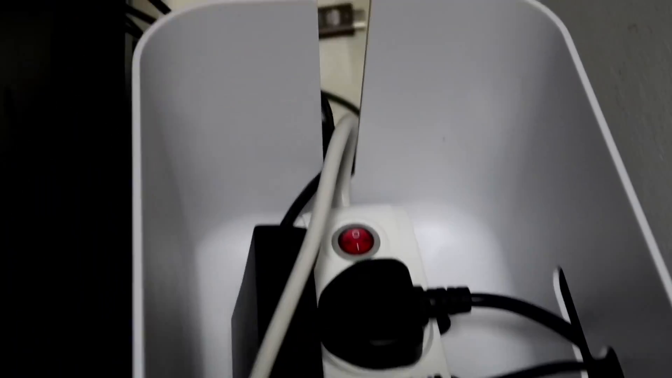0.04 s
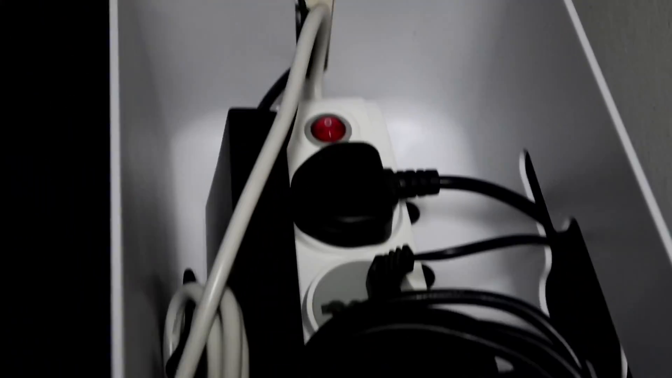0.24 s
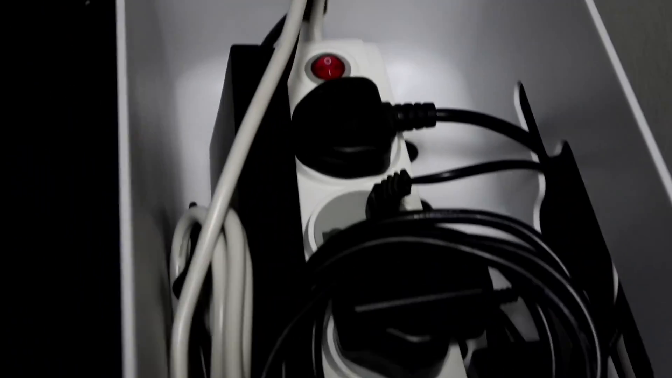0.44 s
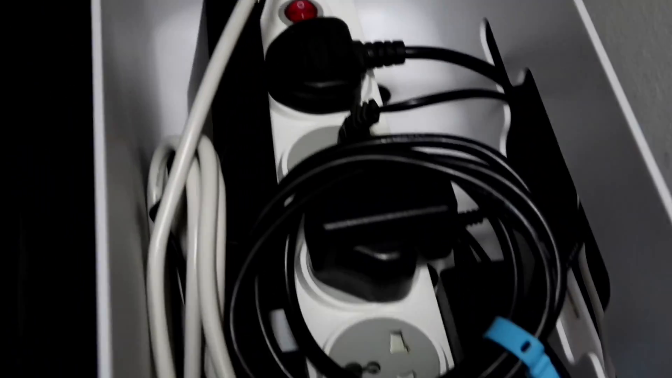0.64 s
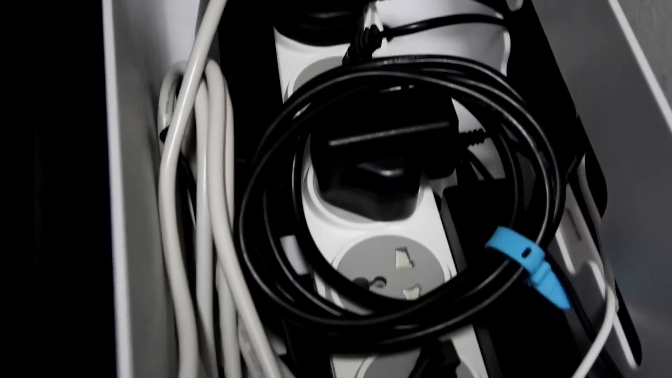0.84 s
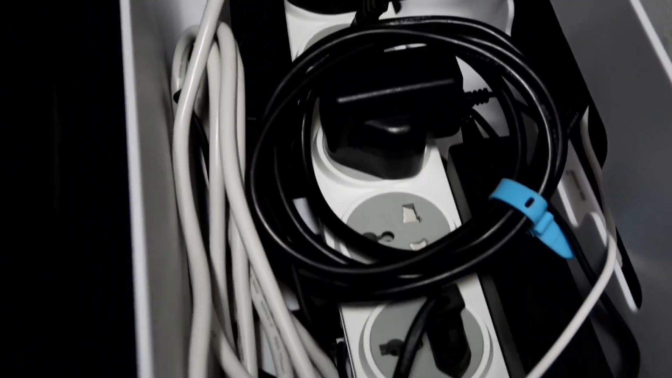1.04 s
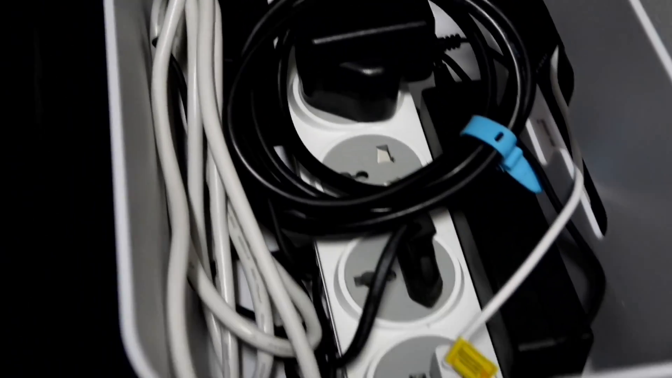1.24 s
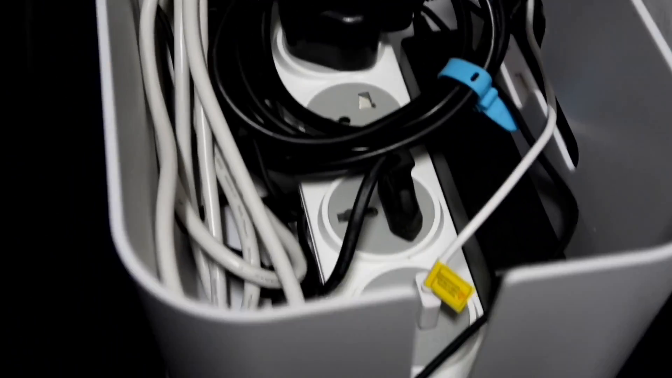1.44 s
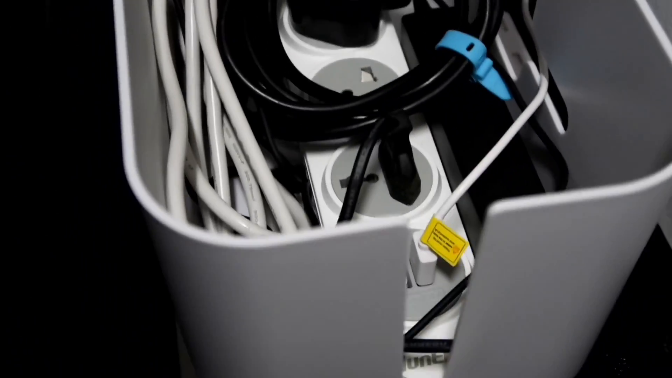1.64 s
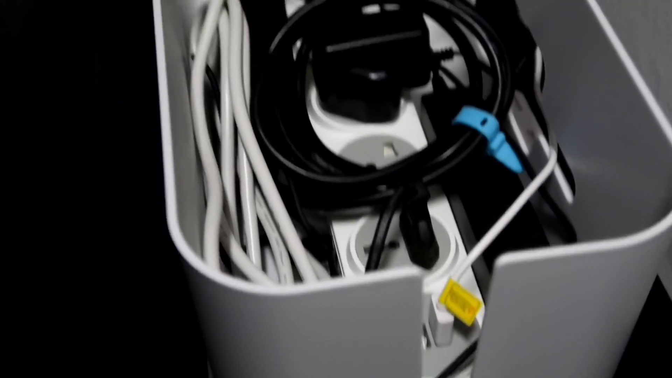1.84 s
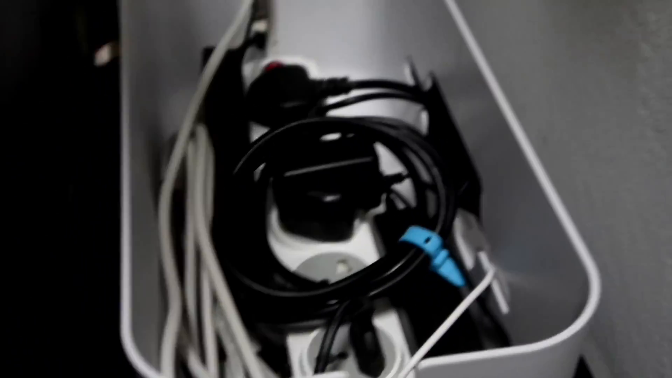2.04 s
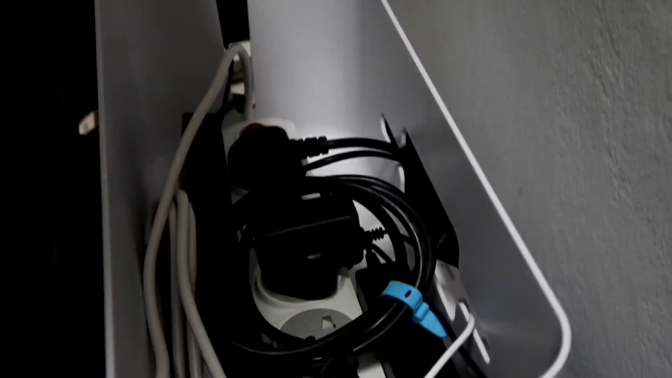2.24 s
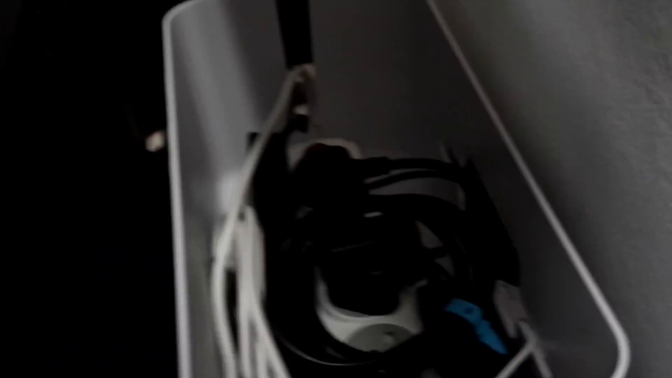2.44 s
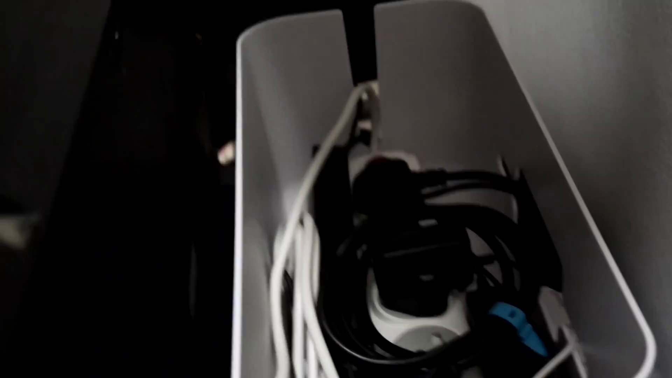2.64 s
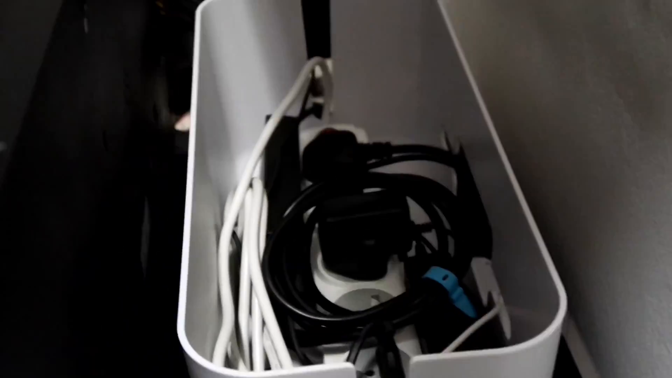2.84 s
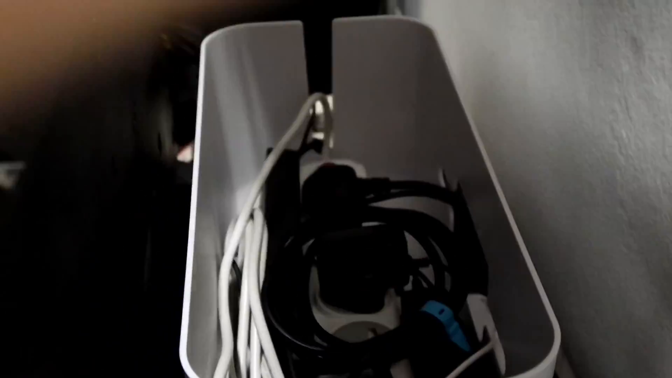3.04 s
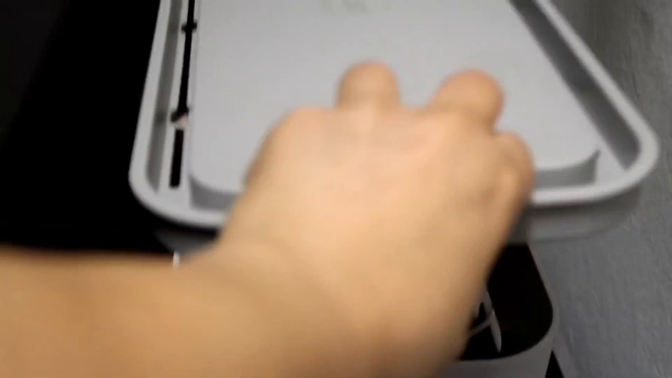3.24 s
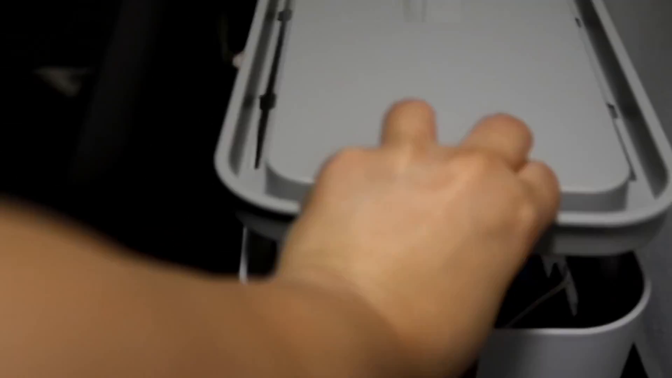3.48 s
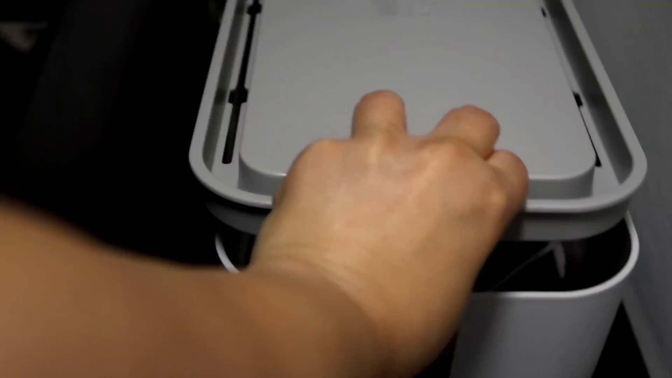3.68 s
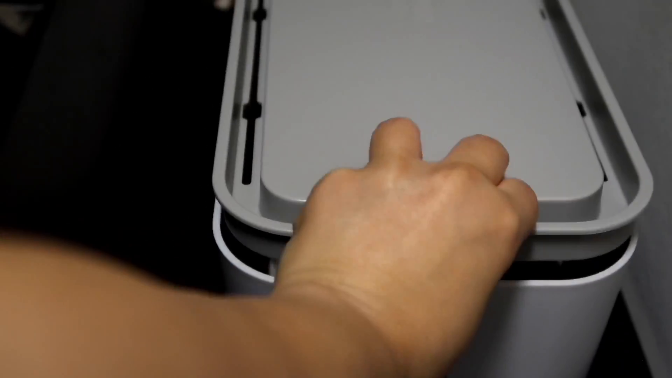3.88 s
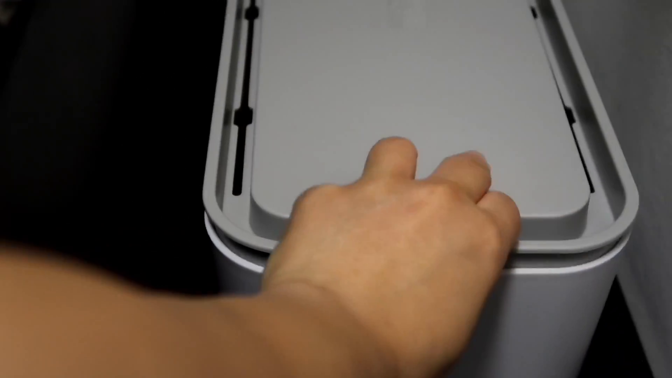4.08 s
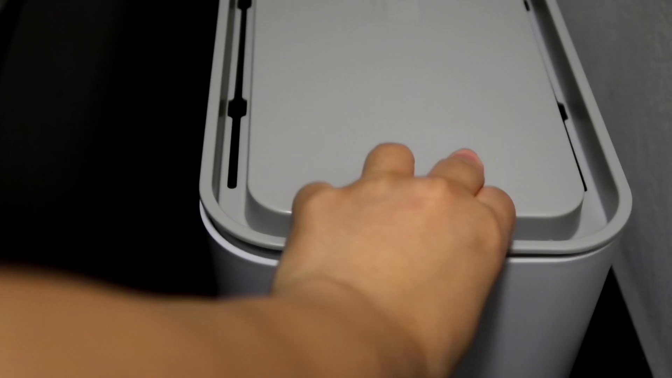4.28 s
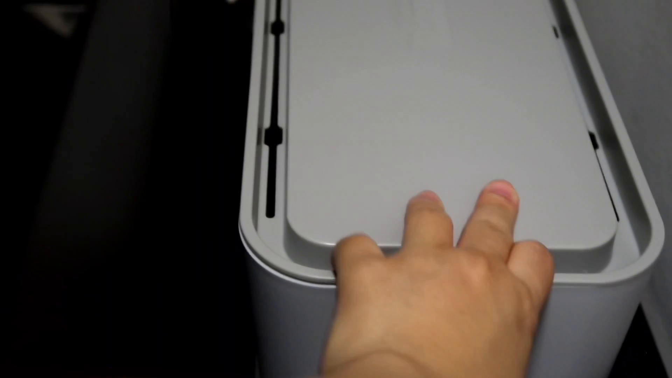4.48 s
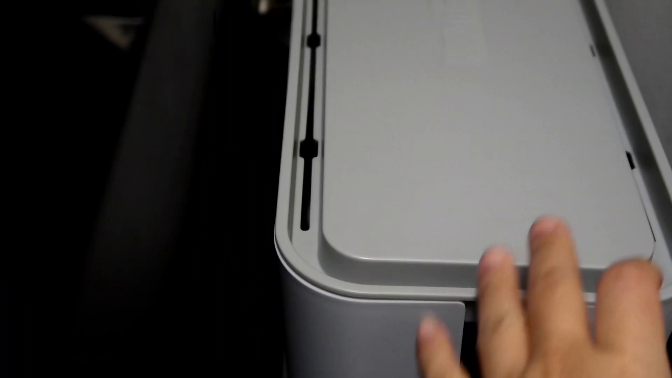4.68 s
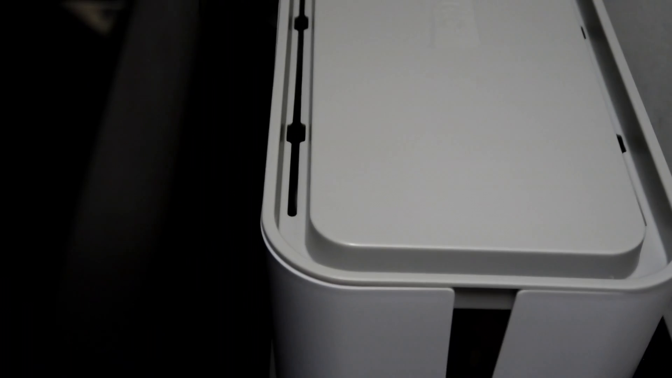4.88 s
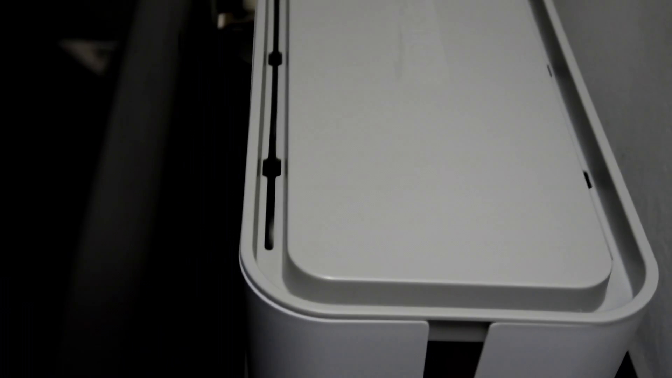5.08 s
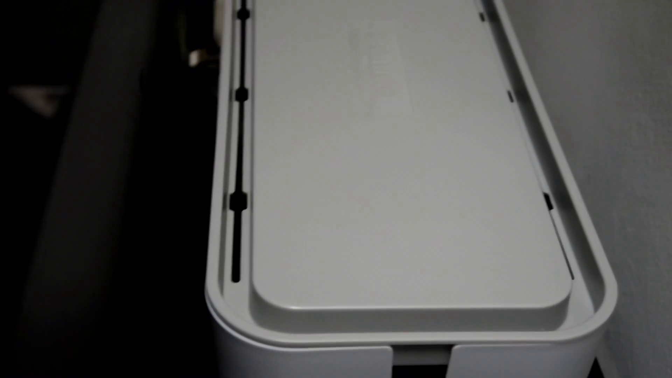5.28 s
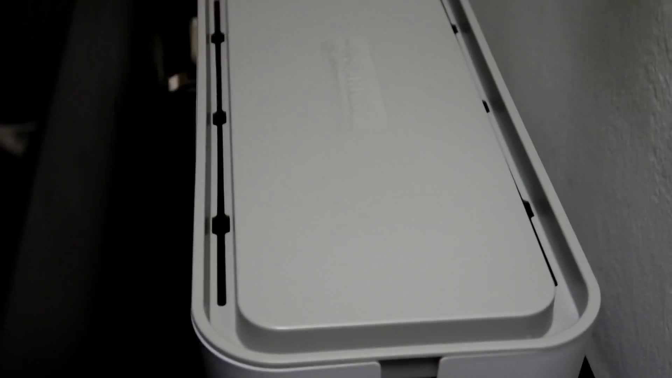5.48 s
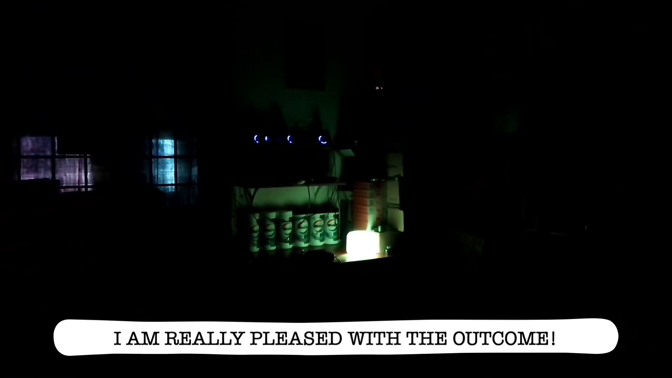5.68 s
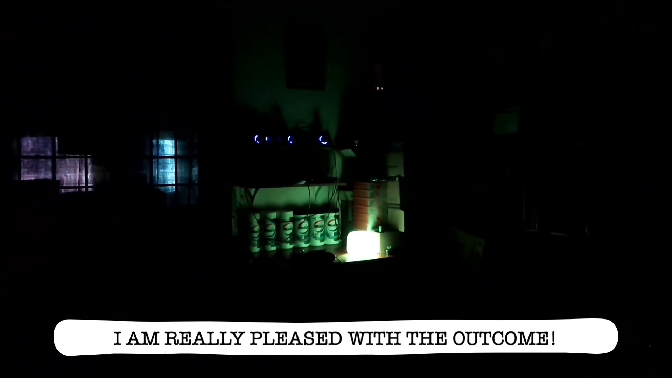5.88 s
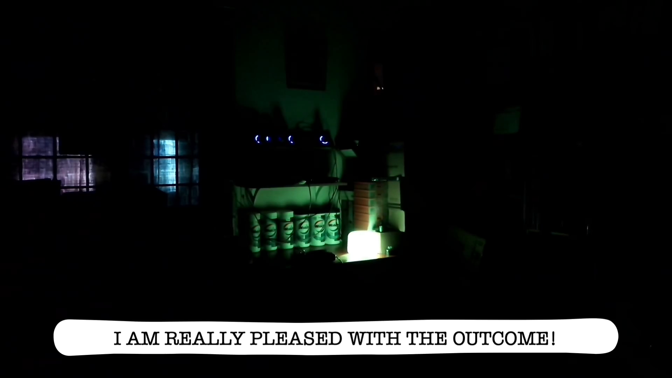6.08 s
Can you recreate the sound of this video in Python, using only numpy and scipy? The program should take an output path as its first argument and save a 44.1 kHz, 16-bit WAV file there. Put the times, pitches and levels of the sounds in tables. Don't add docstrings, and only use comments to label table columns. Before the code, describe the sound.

Close stereo sound indoors: far ticking and soft fan hum, a faint chair creak, then a hard double plastic-on-wood knock, bright snap and loose chatter. Fingers shift softly on the lid. It lands hard on a hollow box, bounces in quick weakening taps, squeaks into place and clicks shut. Muffled creeping squeaks and bumps fade to quiet, before a different room's air with dull distant bumps.

```python
import sys
import numpy as np
from scipy import signal
from scipy.fft import rfft, irfft
from scipy.io import wavfile
from scipy.ndimage import uniform_filter1d

SR = 44100
rng = np.random.default_rng(int(sys.argv[2]) if len(sys.argv) > 2 else 0)


def put_to_file(sound):
    columns = np.atleast_2d(sound).T
    safe = np.clip(columns, -1, 1)
    whole_steps = np.round(safe * 32767)
    wavfile.write(sys.argv[1], SR, whole_steps.astype(np.int16))


def volts_from_decibels(level):
    exponent = np.asarray(level, float) / 20
    return 10 ** exponent


N = 269847

# (pitch [Hz], level [dB], t60 [s])
BOX = [(223, -9, 0.024), (291.4, -5.5, 0.11), (345, 1.5, 0.046)]
# (pitch [Hz], level [dB], t60 [s])
BOARD = [(240.5, 6.5, 0.16), (333.6, 5.5, 0.067), (523, -18, 0.14)]
# (fade-out start [s], fade-out end [s], fade-in start [s], fade-in end [s])
ROOM_CHANGE = (5.651, 5.657, 5.682, 5.7)


def evened(x):
    return x / np.sqrt(np.mean(x ** 2) + 1e-20)


def read(points, hz):
    f, value = np.transpose(points)
    return np.interp(np.log(hz + 1), np.log(f + 1), value)


def add(mix, s, sound):
    part = mix[..., round(s * SR):][..., :sound.shape[-1]]
    part += sound[..., :part.shape[-1]]


def coloured(x, points, tilt_db=0):
    hz = np.fft.rfftfreq(len(x), 1 / SR)
    gain_db = read(points, hz) + tilt_db * np.log2((hz + 50) / 1000)
    return evened(irfft(rfft(x) * volts_from_decibels(gain_db), len(x)))


def resonate(x, hz, width):
    turn = np.exp(2j * np.pi * hz * np.arange(len(x)) / SR)
    r = np.exp(-np.pi * width / SR)
    return 2 * (turn * signal.lfilter([1 - r], [1, -r], x / turn)).real


def ring(modes, t, long=1, pitch=1):
    x = 0
    for hz, db, t60 in modes:
        envelope = volts_from_decibels(db - 60 * t / (t60 * long)) * (1 - np.exp(-t * hz / 0.85))
        x = x + envelope * np.sin(2 * np.pi * hz * pitch * t)
    return x / abs(x).max()


def knocks(rows, modes, base, dense_db, dense_s, crack_s, contact_s, tilt_db, grip=None):
    # (frequency [Hz], density [dB per Hz])
    dense = [(250, -1.5), (500, 0), (900, -2), (1500, -2), (3000, -17), (6000, -24.5), (12000, -57)]
    # (frequency [Hz], density [dB per Hz])
    crack_colour = [(880, -77), (1500, 3), (1960, -0.5), (2370, -5.5), (5490, -3.5), (6560, -12),
                    (7320, -8), (8400, -13), (13000, -21), (16000, -35)]
    out, t = np.zeros(N), np.arange(SR // 5) / SR
    rise = 1 - np.exp(-(t / contact_s) ** 2)
    for s, db, low_db, high_db, factor in rows:
        long, pitch = factor, 1
        if grip:
            long, pitch = grip[0] / factor ** grip[1], factor
        noise = rng.standard_normal((2, len(t)))
        blur = coloured(noise[0], dense) * np.exp(-t / (dense_s * long))
        thump = ring(base, t, long, pitch) * (1 - np.exp(-t / 0.002))
        crack_fall = np.exp(-t / crack_s) + 0.033 * np.exp(-t / 0.0055)
        crack = coloured(noise[1], crack_colour, tilt_db) * crack_fall
        body = ring(modes, t, long, pitch) + volts_from_decibels(dense_db) * blur
        add(out, s, volts_from_decibels(db) * rise * (body + volts_from_decibels(low_db - 2.0) * thump + volts_from_decibels(high_db + 1.0) * crack))
    return out


def pickup():
    # (time [s], peak [dB], thump [dB re peak], crack [dB re peak], ring factor [1])
    blows = [
        (2.2472, -10, -9, -4.5, 0.58),
        (2.24905, -6.5, -7.5, -5.5, 0.78),
        (2.299, -30.5, -2, -11, 1.9),
    ]
    # (pitch [Hz], level [dB], t60 [s])
    modes = [(820, 1.5, 0.13), (1101, -16.5, 0.19), (1310, -34, .09), (1594, 8, 0.048), (1710, 0, 0.044),
             (1920, 5.5, 0.025), (2450, 0, 0.039), (2910, 7.5, 0.029), (2980, -1, 0.04), (3720, -12, 0.035),
             (3930, 6.5, 0.021), (4400, -22, 0.027), (5350, -30, 0.027), (7060, -32, 0.023)]
    return knocks(blows, modes, BOARD, dense_db=-32.0, dense_s=0.0095, crack_s=0.0028,
                  contact_s=0.000099, tilt_db=-2.0)


def putback():
    # (time [s], peak [dB], thump [dB re peak], crack [dB re peak], ring factor [1])
    blows = [
        (2.335, -33.5, -9, 0.5, 0.71),
        (2.3405, -34.5, 8, -7, 0.6),
        (2.368, -54, -2, -21, 0.75),
    ]
    # (pitch [Hz], level [dB], t60 [s])
    modes = [(503, -3.5, 0.48), (810, -10, 0.17), (1093, -7, 0.096), (1590, -13, 0.072), (3300, -16, 0.017),
             (4470, -11, 0.027)]
    return knocks(blows, modes, BOARD, dense_db=-29, dense_s=0.013, crack_s=0.0037,
                  contact_s=0.00056, tilt_db=2.5)


def snap():
    # (time [s], peak [dB], thump [dB re peak], crack [dB re peak], ring factor [1])
    blows = [
        (1.995, -48.5, 11, 0, 0.54),
        (2.303, -34.5, -20, -7, 1),
        (2.4755, -10, -30, -13.5, 0.83),
        (2.4825, -37, -32, -4, 0.44),
        (2.495, -30, -6, -23, 0.36),
        (3.116, -40.5, -3, -4, 1.4),
        (2.724, -54, -30, -4, 0.28),
        (4.0382, -19.5, -38, -5.5, 0.25),
        (4.774, -46, -18, -4.5, 0.37),
        (4.812, -50, 8, -11, 0.79),
    ]
    # (pitch [Hz], level [dB], t60 [s])
    modes = [(637, -15, 0.34), (920, -20, 0.16), (1617, -12, 0.092), (1940, -10, 0.073), (2510, -3, 0.046),
             (3250, -10, 0.1), (3490, -4, 0.063), (3690, -2, 0.066), (4175, -0.5, 0.042),
             (5420, 3.5, 0.053), (5920, 5.5, 0.026), (7380, 4.5, 0.019), (7600, -0.5, 0.018),
             (11100, -15, 0.03)]
    return knocks(blows, modes, BOX, dense_db=-28.5, dense_s=0.037, crack_s=0.0032,
                  contact_s=0.00018, tilt_db=5.0)


def rattle():
    # (time [s], peak [dB], thump [dB re peak], crack [dB re peak], pitch factor [1])
    blows = [(2.508, -34.5, -30, -22, 0.48), (2.5207, -30.5, -33, -21, 0.98), (2.5257, -36, -28, -17, 0.97),
             (2.531, -34, -24, -24, 0.94), (2.539, -40, -25, -24, 1), (2.547, -38, -25, -22, 0.74),
             (2.5551, -31.5, -33, -16, 0.99), (2.561, -35, -30, -20, 0.97), (2.566, -36, -27, -22, 1),
             (2.574, -49, -22, -25, 1), (2.589, -59, -15, -25, 0.82)]
    # (pitch [Hz], level [dB], t60 [s])
    modes = [(929, -9, 0.17), (1570, -11.5, 0.087), (2366, -10, 0.13), (2950, -10, .05), (3630, -5.5, .04),
             (4280, -10, 0.035), (5480, 1, 0.021), (5990, -12, 0.027), (7600, -10, 0.027)]
    return knocks(blows, modes, BOX, dense_db=-26, dense_s=0.014, crack_s=0.0033,
                  contact_s=0.00033, tilt_db=13.0, grip=(0.9, 1.1))


def touch():
    # (time [s], peak [dB], thump [dB re peak], crack [dB re peak], pitch factor [1])
    blows = [(2.578, -36, -23, -35, 0.84), (2.787, -41, -18, -26, 0.93), (2.801, -38, -28, -30, 1.14),
             (2.858, -35.5, -22, -29, 1.07), (2.818, -43, -22, -34, 1.07), (2.872, -43, -20, -34, 1.2),
             (3.442, -62, -12, -24, 0.87), (3.46, -39.5, -30, -30, 0.91)]
    # (pitch [Hz], level [dB], t60 [s])
    modes = [(450, -3, 0.07), (625, -3, 0.074), (774, 8, 0.066), (910, -8, 0.067), (1500, -12, 0.049),
             (1900, -14, 0.088), (2420, -30, 0.067)]
    return knocks(blows, modes, BOX, dense_db=-12, dense_s=0.01, crack_s=0.0042,
                  contact_s=0.00099, tilt_db=-2.0, grip=(0.75, 2.9))


def drop():
    # (time [s], peak [dB], thump [dB re peak], crack [dB re peak], ring factor [1])
    blows = [
        (3.6453, -4, -16.5, -28.5, 0.75),
        (3.6490, -13, -16, -36, 0.54),
        (3.664, -23, -11, -22, 0.4),
    ]
    # (pitch [Hz], level [dB], t60 [s])
    modes = [(778, -3, 0.12), (864, -4.5, 0.058), (808, -2, 0.21), (1020, -12, 0.021), (1300, -13, 0.11),
             (1373, 2.5, 0.035), (1530, -6, 0.067), (1930, -12, 0.14), (2420, -8, 0.084), (2770, -4, 0.047),
             (2910, -18, 0.071), (3300, -17, 0.049), (4140, -8.5, 0.03)]
    return knocks(blows, modes, BOX, dense_db=-20.5, dense_s=0.017, crack_s=0.0048,
                  contact_s=0.000086, tilt_db=-0.5)


def rebound():
    # (time [s], peak [dB], thump [dB re peak], crack [dB re peak], ring factor [1])
    blows = [
        (3.6912, -11.5, -2.5, -13.5, 0.47),
        (3.698, -23, -13, -24, 0.9),
        (3.71, -24, -2, -26, 1.0),
        (3.737, -24, -16, -11.5, 0.78),
        (3.742, -35, -8, -21, 1.0),
    ]
    # (pitch [Hz], level [dB], t60 [s])
    modes = [(446, 1.5, 0.062), (623, -13, 0.046), (760, 4, 0.057), (1060, 2, 0.069), (1340, -10, 0.11),
             (1560, -7, 0.069), (1930, -1, 0.026), (2106, -1, .03), (2470, -6.5, 0.05), (3020, -15, 0.043)]
    return knocks(blows, modes, BOX, dense_db=-13, dense_s=0.0088, crack_s=0.0049,
                  contact_s=0.00035, tilt_db=-0.7)


def settle():
    # (time [s], peak [dB], thump [dB re peak], crack [dB re peak], pitch factor [1])
    blows = [
        (3.767, -21, -27, -28, 1),
        (3.772, -27, -27, -32, 0.92),
        (3.776, -34, -27, -32, 0.77),
        (3.781, -5, -7, -18, 0.99),
        (3.901, -36, -23, -30, 0.9),
        (3.911, -10, -6, -23, 0.97),
        (3.917, -18.5, -23, -18, 0.99),
    ]
    # (pitch [Hz], level [dB], t60 [s])
    modes = [(413, -19, 0.095), (653, 2.5, 0.036), (787, 9.5, 0.068), (905, 7.5, 0.048), (1125, -16, 0.12),
             (1310, 8.5, 0.026), (1430, 0.5, 0.046), (1500, -23, 0.032), (1947, -5.5, 0.049),
             (2504, -16, 0.11), (3020, -14, 0.1)]
    return knocks(blows, modes, BOX, dense_db=-14, dense_s=0.016, crack_s=0.0043,
                  contact_s=0.0012, tilt_db=5.5, grip=(0.82, 1.1))


def bounce():
    # (time [s], peak [dB], thump [dB re peak], crack [dB re peak], ring factor [1])
    blows = [
        (3.809, -12, -17, -17, 0.71),
        (3.824, -21.5, -4, -7.5, 0.6),
        (3.833, -25, -14, -27, 1.0),
        (3.844, -26.5, -15, -13, 0.55),
        (3.858, -29, -24, -28, 0.78),
    ]
    # (pitch [Hz], level [dB], t60 [s])
    modes = [(475, 3, 0.099), (756, 14, 0.024), (930, -12, 0.089), (1005, 1.5, 0.064), (1260, -1.5, 0.068),
             (1574, -9, 0.05), (1790, -15, 0.082), (2214, -6.5, 0.069), (3470, -35, 0.053)]
    return knocks(blows, modes, BOX, dense_db=-15, dense_s=0.0081, crack_s=0.0056,
                  contact_s=0.00027, tilt_db=-3.5)


def press():
    # (time [s], peak [dB], thump [dB re peak], crack [dB re peak], pitch factor [1])
    blows = [
        (4.0118, -19.5, -22, -15, 1.036),
        (4.0155, -14.5, -5.5, -15, 1.04),
        (4.0383, -13, -25, -11.5, 0.94),
        (4.0415, -2.5, -27, -23, 1),
    ]
    # (pitch [Hz], level [dB], t60 [s])
    modes = [(527, -4.5, 0.061), (668, -1.5, 0.073), (746, 6, 0.052), (910, -8, 0.054), (1190, -29, .06),
             (1400, -6, 0.034), (1510, -7, 0.048), (1650, -4.5, 0.036), (1913, -3, 0.042),
             (2130, -28, 0.026), (2840, -3.5, 0.015)]
    return knocks(blows, modes, BOX, dense_db=-11.5, dense_s=0.0062, crack_s=0.0076,
                  contact_s=0.0013, tilt_db=-1.0, grip=(0.7, 0.3))


def release():
    # (time [s], peak [dB], thump [dB re peak], crack [dB re peak], ring factor [1])
    blows = [(4.131, -30.5, -3, -29, 1.6), (4.227, -28, 2, -17.5, 1.25), (4.258, -33.5, 3, -30, 0.93),
             (4.343, -26, -12, -40, 0.84), (4.349, -21.5, -10, -36, 1.04), (4.361, -22, -31, -30, 0.84),
             (4.427, -20.5, -3, -27, 0.9), (4.435, -26, -33, -34, 1.3), (4.459, -34, -19, -27, 1.1),
             (4.584, -36.5, -9, -12, 1.5), (4.609, -38.5, -12, -13, 0.74)]
    # (pitch [Hz], level [dB], t60 [s])
    modes = [(401, -0.5, 0.063), (509, 1.5, 0.04), (748, 3, 0.035), (990, 6.5, 0.024), (1326, 2.5, 0.025),
             (1530, -6, 0.049), (1757, -18, 0.13), (2050, -8.5, 0.047), (2570, -18, 0.032),
             (5300, -29, 0.023)]
    return knocks(blows, modes, BOX, dense_db=-11.0, dense_s=0.011, crack_s=0.01,
                  contact_s=0.002, tilt_db=3.0)


def squeak(rows, rough, overtones_db, direct_db):
    # (pitch [Hz], width [Hz], level [dB])
    rim = [(770, 66, 4), (920, 38, 5), (1020, 47, 4), (1082, 49, 3), (1865, 49, 1), (2040, 37, 5.5),
           (2125, 61, 7.5), (2147, 81, 10.5), (2730, 78, 7), (3040, 240, 3), (3320, 70, 6),
           (3710, 95, 12.5), (4030, 120, 1), (4340, 70, 0)]
    s, *columns = np.transpose(rows)
    t = np.arange(s[0], s[-1], 1 / SR)
    hz, tone_hz, db, over_db = (np.interp(t, s, c) for c in columns)

    def chance(size):
        return evened(uniform_filter1d(uniform_filter1d(rng.standard_normal(len(t)), size), size))

    tone = np.sin(2 * np.pi * np.cumsum(tone_hz * (1 + 0.054 * rough * chance(130))) / SR)
    tone = tone * (1 + 1.1 * rough * chance(160)) * (1 + 0.9 * rough * chance(30))
    turns = np.cumsum(hz * (1 + 0.125 * rough * chance(60))) / SR
    stack = 0
    for k, lift_db in enumerate(overtones_db, 1):
        overtone = np.sin(2 * np.pi * (k + 1) * turns)
        stack = stack + volts_from_decibels(lift_db) * (1 + 0.27 * k * chance(50)) * overtone
    slips = tone + volts_from_decibels(-8) * np.sin(2 * np.pi * turns) + volts_from_decibels(over_db - 8) * stack
    slips = volts_from_decibels(db - 3.5) * slips * signal.windows.tukey(len(t), 0.1)
    slips = np.pad(slips, (0, 2000))
    rung = sum(volts_from_decibels(lift_db) * resonate(slips, f, width) for f, width, lift_db in rim)
    return s[0], volts_from_decibels(direct_db) * slips + rung


def rim_squeaks():
    # (time [s], slip rate [Hz], pure tone [Hz], level [dB], overtones [dB])
    going_in = [(3.945, 979, 967, -40, -4), (3.96, 965, 990, -33.5, -2), (3.968, 1060, 997, -32.5, -3.5),
                (3.983, 1082, 1097, -30.5, -0.5), (4.0, 1093, 1079, -36, -1), (4.011, 1072, 1085, -36, 2),
                (4.016, 1076, 1090, -48, 0), (4.035, 1120, 1094, -45, -2)]
    # (time [s], slip rate [Hz], pure tone [Hz], level [dB], overtones [dB])
    easing = [(4.122, 840, 768, -31.5, 1), (4.137, 920, 778, -28, -5), (4.146, 1000, 992, -36, 7),
              (4.154, 995, 1069, -31, 4.5), (4.169, 1003, 1082, -30, -1), (4.189, 1021, 1082, -38, 6.5),
              (4.198, 1062, 1020, -39.5, 6), (4.217, 998, 945, -32, -8.5), (4.238, 1020, 910, -40, -5)]
    # (time [s], slip rate [Hz], pure tone [Hz], level [dB], overtones [dB])
    creeping = [(4.234, 964, 910, -37, 0), (4.251, 935, 934, -33, -1), (4.269, 980, 969, -34.5, -3),
                (4.284, 1007, 990, -34.5, 1), (4.299, 1024, 921, -41.5, -3), (4.309, 1005, 930, -38.5, 2.5),
                (4.321, 1003, 972, -32, -12), (4.335, 1015, 875, -43.5, -1), (4.372, 986, 770, -46, 8)]
    # (time [s], slip rate [Hz], pure tone [Hz], level [dB], overtones [dB])
    dying = [(4.365, 888, 905, -46, 0), (4.39, 856, 857, -39, 0), (4.449, 874, 821, -41.5, 0),
             (4.52, 872, 862, -54, 0)]
    out = np.zeros(N)
    add(out, *squeak(going_in, rough=0.29, overtones_db=(-3.0, -4.0, 0.5, -7), direct_db=-8.0))
    add(out, *squeak(easing, rough=0.28, overtones_db=(-0.8, -3.5, -11.5, -15.5), direct_db=-7.0))
    add(out, *squeak(creeping, rough=0.2, overtones_db=(-1.3, -16.5, -20, -32), direct_db=-1.5))
    add(out, *squeak(dying, rough=0.31, overtones_db=(2, -19, -21, -34), direct_db=-5.0))
    return out


def rubs():
    # (start [s], hardest [s], end [s], level [dB], brightness [0-1])
    strokes = [(0.838, 0.843, 0.96, -56, 0.8), (1.984, 2, 2.14, -55, 0.94), (2.264, 2.3, 2.44, -39, 0.37),
               (2.484, 2.53, 2.64, -46, 0.8), (2.761, 2.798, 2.92, -44.5, 0.05),
               (3.437, 3.454, 3.5, -42, 0), (3.658, 3.67, 3.74, -41, 0.1), (3.738, 3.837, 3.85, -33, 0.29),
               (3.83, 3.944, 4.12, -41, 0.14), (4.105, 4.265, 4.64, -41.5, 0.06),
               (4.545, 4.588, 4.64, -50, 0.82), (4.78, 4.812, 4.835, -47, 0.68),
               (4.842, 4.882, 4.92, -53.5, 0.99), (4.127, 4.14, 4.24, -53, 0.8)]
    # (frequency [Hz], density [dB per Hz])
    colour = [(88, -31), (150, -16), (217, -7), (391, -13.5), (466, 12), (524, -0.5), (730, 2.5),
              (1210, -14), (1600, -3), (5360, -18), (16000, -47)]
    out = np.zeros(N)
    for start, hardest, end, db, share in strokes:
        t = np.arange(start, end, 1 / SR)
        catches_db = 2.5 * evened(uniform_filter1d(rng.standard_normal(len(t)), 250))
        grains = rng.standard_normal(len(t)) * volts_from_decibels(catches_db)
        dull, bright = coloured(grains, colour, -7.0), coloured(grains, colour, 5.3)
        share = np.clip(share, 0, 1)
        stroke_db = np.interp(t, [start, hardest, end], [-12.5, 0, -22.5])
        grains = dull * (1 - share) + bright * share
        add(out, start, volts_from_decibels(db + stroke_db) * grains * signal.windows.tukey(len(t), 0.05))
    return out


def creak():
    # (pitch [Hz], level [dB], width [Hz])
    joints = [(696, -54.5, 25), (1220, -55, 46), (1370, -50.5, 42), (2120, -59, 90), (2900, -59.5, 40),
              (5650, -66, 90)]
    # (start [s], length [s])
    span = (.85, 0.073)
    size = round(span[1] * SR)
    groan = sum(volts_from_decibels(db) * evened(resonate(rng.standard_normal(size), hz, w)) for hz, db, w in joints)
    return span[0], np.hanning(size) * groan


def room(x):
    # (frequency [Hz], t60 [s])
    decay = [(200, 0.38), (1000, 0.16), (4000, 0.18), (12000, 0.13)]
    taps = np.zeros(SR // 2)
    at = np.arange(130, SR // 2 - 20, 20) + rng.integers(0, 20, (SR // 2 - 131) // 20)
    taps[at] = rng.choice([-1., 1.], at.shape)
    hz, t, z = signal.stft(taps, SR, nperseg=256)
    tail = signal.istft(z * volts_from_decibels(-60 * t / read(decay, hz)[:, None]), SR, nperseg=256)[1]
    return signal.fftconvolve(x, tail / np.linalg.norm(tail))[:N]


def microphones(x):
    # (frequency [Hz], side re mid [dB])
    difference = [(60, -41), (180, -69), (550, -49), (1650, -19), (4970, -10.5), (15000, 2)]
    scatter = np.pad(rng.standard_normal(400) * np.exp(-np.arange(400) / 40), (0, 624))
    scatter = np.roll(scatter, 1)
    scatter = np.roll(scatter - np.roll(scatter[::-1], 1), 200)
    gain = volts_from_decibels(read(difference, np.fft.rfftfreq(1024, 1 / SR)))
    scatter = irfft(rfft(scatter / np.linalg.norm(scatter)) * gain)
    side = signal.oaconvolve(x, scatter)[200:N + 200]
    low_cut = signal.butter(3, 160, "high", fs=SR, output="sos")
    return signal.sosfilt(low_cut, [x + side, x - side])


def clock():
    # (pitch [Hz], level [dB], t60 [s])
    tick = [(2506, -1.5, 0.1), (2670, 18, 0.0092), (3260, -18, 0.037), (5540, 0, 0.056),
            (5890, -3.5, 0.054)]
    # (pitch [Hz], level [dB], t60 [s])
    tock = [(1580, -8, 0.23), (2766, -3.5, 0.16), (3220, 13, 0.033), (3850, 2, 0.082), (4590, 8, 0.037),
            (5700, -5, 0.15)]
    swing_s, peak_db = 0.5163, -40.5
    out, t = np.zeros((2, N)), np.arange(SR // 6) / SR
    for first_s, modes, long in ((0.0309, tick, 0.25), (0.2965, tock, 0.12)):
        for s in np.arange(first_s, ROOM_CHANGE[0], swing_s):
            smear = rng.standard_normal((2, len(t))) * np.exp(-t / 0.025)
            smear[1] = 0.5 * smear[0] + 0.64 * smear[1]
            beat = signal.fftconvolve(smear, ring(modes, t, long)[None], axes=1)[:, :len(t)]
            add(out, s, volts_from_decibels(peak_db) * beat / abs(beat).max())
    return out


def fan():
    # (pitch [Hz], width [Hz], level [dB], haze share [1])
    hum = [
        (98.3, 10.8, -60.5, 1.6),
        (194.8, 7.14, -53.5, 0.66),
        (285.6, 16.2, -59, 1.1),
        (380.4, 8.7, -63, 1.2),
    ]
    out, t = 0, np.arange(N) / SR
    for hz, width, db, share in hum:
        haze = evened(resonate(resonate(rng.standard_normal(N), hz, 2 * width), hz, 2 * width))
        wander = evened(uniform_filter1d(rng.standard_normal(N), size=6000, mode="wrap"))
        core = np.sqrt(2) * np.sin(2 * np.pi * (hz * t + 0.3654 * width * np.cumsum(wander) / SR))
        out = out + volts_from_decibels(db + 0.6) * (core + share * haze) / np.hypot(1, share)
    return out


def air(points, level_db, patchy_db):
    # (frequency [Hz], left-right likeness [1])
    likeness = [(60, 0.97), (180, 1), (550, 0.31), (1650, 0.018), (4970, 0.16), (15000, 0.023)]
    frames, hz = N // 256 + 5, np.fft.rfftfreq(1024, 1 / SR)
    a, b, c, d, patches = rng.standard_normal((frames, 513, 5)).T
    patches = evened(uniform_filter1d(uniform_filter1d(patches, 12, 0), 10, 1))
    same = np.clip(read(likeness, hz), -1, 1)[:, None]
    left = a + 1j * b
    z = np.array([left, same * left + np.sqrt(1 - same ** 2) * (c + 1j * d)])
    z *= volts_from_decibels(read(points, hz)[:, None] + patchy_db * patches)
    return volts_from_decibels(level_db) * evened(signal.istft(z, nperseg=1024, noverlap=768)[1][:, :N])


def first_air():
    # (frequency [Hz], density [dB per Hz])
    spectrum = [(15, -64), (30, -46), (48, -33), (70, -36), (92, -13), (145, -31.5), (195, 7), (212, -3.5),
                (229, -28.5), (293, -12.5), (354, -14), (384, -11), (463, -13), (1610, -24.5), (9070, -36),
                (16000, -44.5)]
    return air(spectrum, -50.5, patchy_db=1.3)


def second_room():
    # (frequency [Hz], density [dB per Hz])
    spectrum = [(15, -54), (25, -64), (108, -0.5), (212, -13), (285, 1.5), (317, -12.5), (373, 1),
                (463, -16), (503, -10), (659, -7.5), (754, -13), (1850, -18.5), (2030, -14.5),
                (2300, -22.5), (2600, -18), (2900, -21.5), (16000, -40)]
    # (time [s], peak [dB], pitch [Hz])
    bumps = [
        (5.763, -41, 129),
        (5.771, -43, 150),
        (5.80, -41, 139),
    ]
    out = air(spectrum, -47, patchy_db=1.3)
    t = np.arange(3000) / SR
    for s, db, hz in bumps:
        add(out, s, volts_from_decibels(db) * ring([(hz, 0, 0.05), (2.38 * hz, -6, 0.03)], t))
    return out


def scene():
    lid = pickup() + putback() + snap() + rattle() + touch()
    lid += drop() + rebound() + settle() + bounce() + press() + release()
    lid += rim_squeaks() + rubs()
    add(lid, *creak())
    first = microphones(lid + volts_from_decibels(-11.0) * room(lid)) + clock() + fan() + first_air()
    t = np.arange(N) / SR
    fade_out = np.interp(t, ROOM_CHANGE[:2], [1, 0]) ** 2
    fade_in = np.interp(t, ROOM_CHANGE[2:], [0, 1]) ** 1.9
    return first * fade_out + second_room() * fade_in


def roll_off(x):
    return signal.sosfilt(signal.butter(12, 16630, fs=SR, output="sos"), x)


def record(dry):
    overloaded = dry / (1 + (dry / 0.66) ** 4) ** 0.3
    band_limit = signal.firwin(255, 16050, window=("kaiser", 9), fs=SR)
    limited = signal.oaconvolve(overloaded, band_limit[None], "same")
    return roll_off(limited)


dry = scene()
out = record(dry)
put_to_file(out)
```